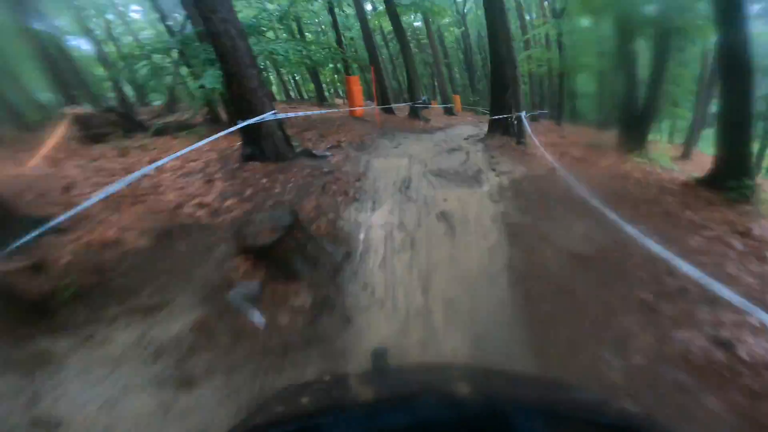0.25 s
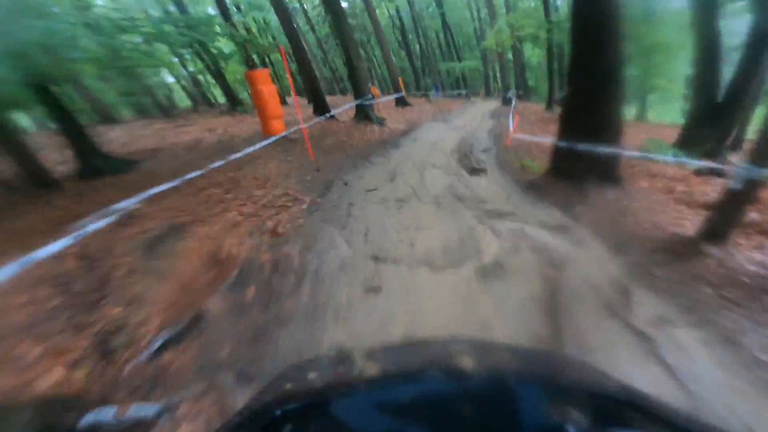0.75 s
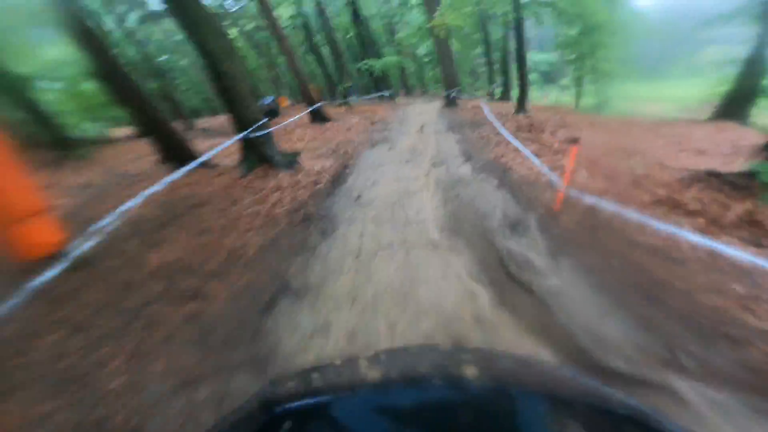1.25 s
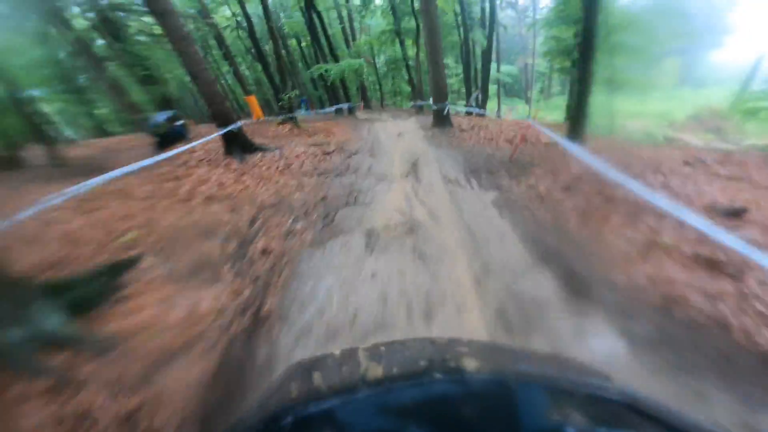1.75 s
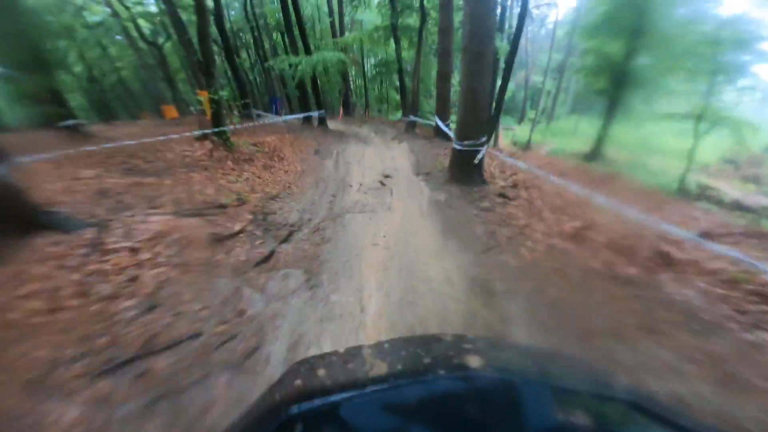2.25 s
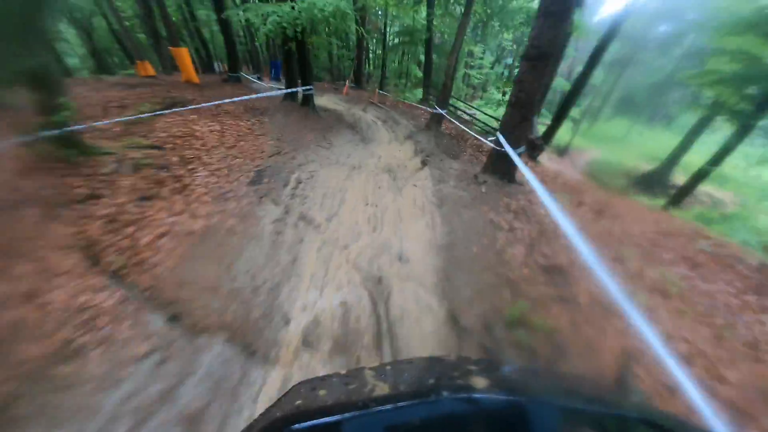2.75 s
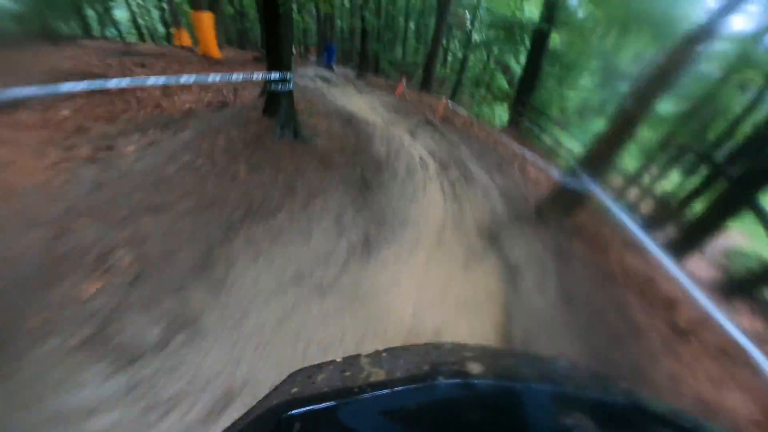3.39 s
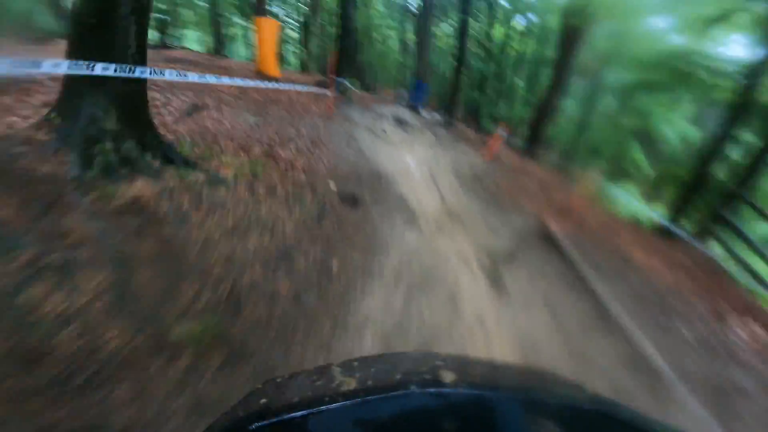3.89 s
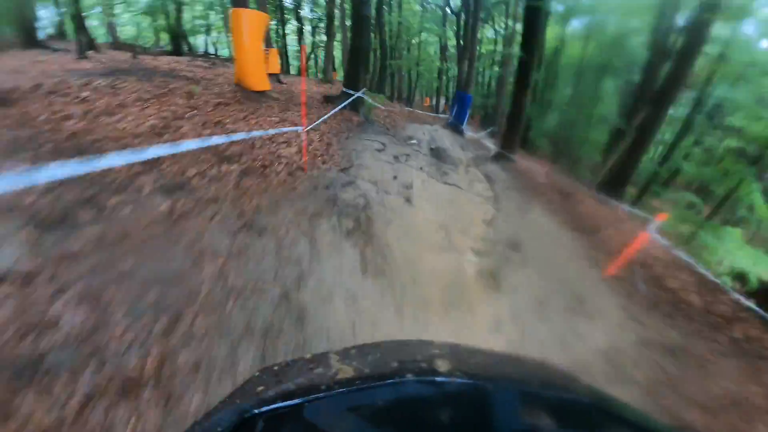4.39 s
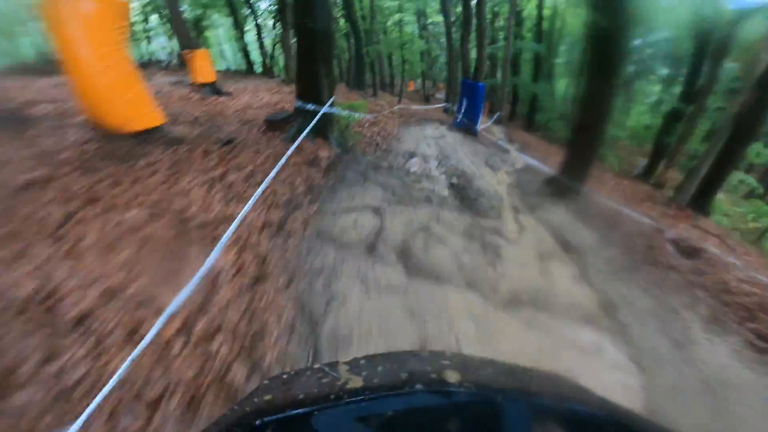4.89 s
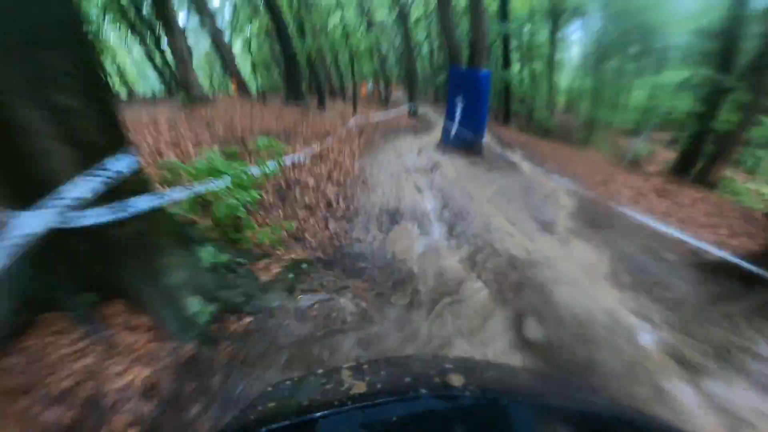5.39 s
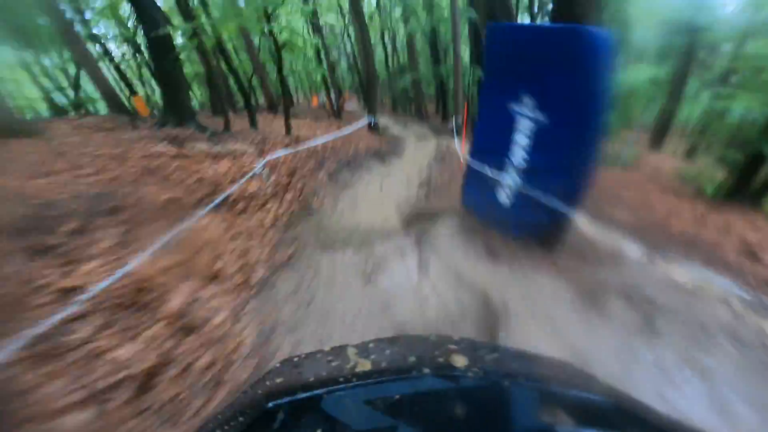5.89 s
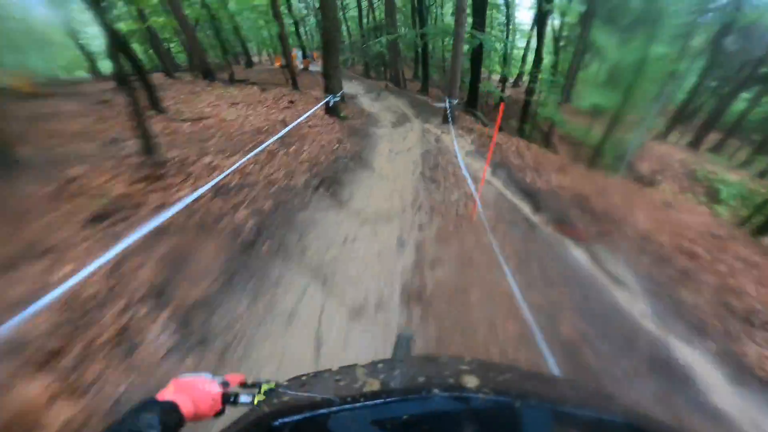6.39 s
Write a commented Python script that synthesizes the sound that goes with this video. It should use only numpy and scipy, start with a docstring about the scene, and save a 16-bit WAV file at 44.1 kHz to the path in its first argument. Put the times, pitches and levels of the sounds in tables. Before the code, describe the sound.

Close, muffled onboard sound of a fast ride over wet, rooty ground: low pulsing wind, hollow rolling tyres and irregular jolts. Hard, boxy knocks cluster early, ease off, then return singly and in small groups to the end. Small sharp ticks and wet spatters flick past. Around the middle comes a tiny high brake squeak ending on a crisp click; near the end a brighter splash and soft chain shiver. Treble is dulled, peaks rounded.

```python
"""Wind buffets a sealed housing on the helmet of a rider going fast down a wet, rooty forest track.
Tyres roll and jolt, mud sprays, grit ticks and the mount knocks; a wet brake sings briefly, the chain jingles.
Wind, tyres, mud and chain are shaped noise or random grains; knocks and ticks are struck decaying modes;
the brake is a wavering near-sine. The housing rounds the peaks and muffles the treble."""
import sys
import numpy as np
from scipy import signal
from scipy.fft import rfft, irfft
from scipy.io import wavfile

SR = 44100
rng = np.random.default_rng(int(sys.argv[2]) if len(sys.argv) > 2 else 0)


def unload_wav(signal):
    """Save mono or channel-first audio to the path in sys.argv[1] as 16-bit WAV at rate SR, clipped to [-1, 1]."""
    wavfile.write(
        sys.argv[1],
        SR,
        np.round(np.clip(np.atleast_2d(signal).T, -1, 1) * 32767).astype(np.int16),
    )


N = 292824

# ground under the tyres: (time [s], rolling level [dB], spray level [dB], grittiness [dB re rolling])
GROUND_CURVE = [(0.0, -31.5, -49, -0.5), (0.15, -34, -53, 13.5), (0.29, -41.5, -55, 16.5),
                (0.52, -27, -63, -2.5), (0.79, -31, -52.5, 9), (1.27, -33, -52.5, 1.5),
                (1.55, -29.5, -66, 4), (1.83, -30, -55, -0.5), (2.25, -30.5, -53.5, -0.5),
                (2.4, -28, -51.5, 0), (3.59, -31, -56.5, 4), (3.94, -25.5, -53, 2.5), (4.23, -34, -56, 2),
                (4.92, -32, -60, -6.5), (5.27, -31, -52, 2.5), (5.9, -28, -51.5, 2), (6.34, -34, -59, -5.5),
                (6.64, -34.5, -64, 0)]
# roots and stones hit by the wheels: (start [s], length [s], level [dB], grittiness [dB re level])
WHEEL_BUMPS = [(0.059, 0.036, -31.5, 16), (0.08, 0.05, -20, 6), (0.175, 0.025, -32.5, 15.5),
               (0.25, 0.032, -20.5, 7.5), (0.288, 0.021, -28, 9), (0.317, 0.018, -33, 9.5),
               (0.378, 0.016, -21.5, -10), (0.415, 0.011, -21.5, -19), (0.504, 0.011, -16, -5),
               (0.622, 0.038, -31, 14.5), (0.907, .03, -26.5, 1), (0.973, 0.057, -18, -24),
               (1.011, 0.0473, -22, 2.5), (1.08, 0.049, -18.5, -6.5), (1.169, 0.015, -26, 5),
               (1.241, 0.045, -19.5, -15), (1.341, 0.027, -19.5, -14), (1.379, 0.035, -21, -15),
               (1.451, 0.031, -22, -7), (1.872, 0.025, -30, 11.5), (2.26, 0.057, -27.5, 8),
               (2.366, 0.072, -32, 14.5), (2.54, 0.019, -30, 13.5), (2.609, 0.015, -29.5, 17.5),
               (2.817, 0.025, -28, -28), (3.049, 0.09, -30, -1), (3.167, 0.045, -19.5, -5),
               (3.274, 0.037, -24.5, 2), (3.753, 0.014, -18.5, 5.5), (3.873, 0.045, -26.5, -7),
               (4.021, 0.065, -30.5, 7.5), (4.106, 0.02, -28.5, 15.5), (4.352, 0.02, -22, -2),
               (5.09, 0.028, -28, 3), (5.012, 0.074, -28, 0), (5.147, 0.015, -23.5, -16),
               (5.278, 0.046, -34, 6), (5.411, 0.029, -36, 9), (5.609, 0.037, -24.5, -26),
               (5.93, 0.045, -28, -4), (6.098, 0.0063, -36, -10), (6.104, 0.011, -28, 10.5),
               (6.316, 0.02, -24, -24), (6.345, 0.026, -15.5, -28), (6.49, 0.0069, -24.5, -30)]
BUMP_ATTACK_S, BUMP_RELEASE_S = 0.0038, 0.0094


def amp(db):
    """Decibels to gain."""
    return 10 ** (np.asarray(db) / 20)


def rms_one(x):
    """Scale to rms 1."""
    return x / np.sqrt(np.mean(x ** 2) + 1e-20)


def in_time(rows):
    """Columns of a curve table, interpolated to one value a sample."""
    s, *columns = np.transpose(rows)
    return [np.interp(np.arange(N) / SR, s, column) for column in columns]


def drift(rate_hz):
    """Slow random wander of rms 1: noise through two equal poles at rate_hz."""
    step = 40   # samples between computed values
    pole = np.exp(-2 * np.pi * rate_hz * step / SR)
    noise = rng.standard_normal(N // step + 2002)
    slow = signal.lfilter([1], [1, -2 * pole, pole * pole], noise)[2000:]   # drop the run-in
    return np.interp(np.arange(N) / step, np.arange(len(slow)), rms_one(slow))


def filtered(x, order, cut_hz, kind="low"):
    """Butterworth filter."""
    return signal.sosfilt(signal.butter(order, cut_hz, kind, fs=SR, output="sos"), x)


def coloured(x, spectrum):
    """Give x a spectrum with minimum phase, so that nothing sounds before its cause; rms 1."""
    size = 2 ** 19
    hz, level_db = np.transpose(spectrum)
    grid_hz = np.maximum(np.fft.rfftfreq(size, 1 / SR), 1)
    log_gain = np.interp(np.log(grid_hz), np.log(hz), level_db) * np.log(10) / 20
    cepstrum = irfft(log_gain)
    # folding the cepstrum onto positive time gives the minimum phase
    cepstrum[1:size // 2] *= 2
    cepstrum[size // 2 + 1:] = 0
    response = np.exp(rfft(cepstrum))
    return rms_one(irfft(rfft(x, size) * response)[:N])


def grains(per_s, spread_db):
    """Random clicks of either sign at random times, with exponentially spread dB levels; rms 1."""
    level_db = spread_db * np.minimum(rng.exponential(1, N), 4)
    sizes = amp(level_db) * rng.choice([-1, 1], N)
    return rms_one(sizes * (rng.random(N) < per_s / SR))


def swells(rows, attack_s, release_s):
    """Gain of events that ramp up ahead of their start, hold for their length and die away; powers add."""
    t, power = np.arange(N) / SR, 0
    for s, length_s, db, *_ in rows:
        rise = np.clip(1 + (t - s) / attack_s, 0, 1) ** 2
        fall = np.exp(-np.maximum(t - s - length_s, 0) / release_s)
        power = power + (amp(db) * rise * fall) ** 2
    return np.sqrt(power)


def strike(events, dull, bright, rattle_s, soft_hz, contact_hz, scatter_db, detune):
    """Each blow chatters and rings all modes at scattered levels and pitches; sharper ones favour the bright."""
    s, blow_db, bright_db = np.transpose(events)
    after = np.arange(1500)
    after_s = after / SR
    at = np.minimum(np.round(s * SR).astype(int)[:, None] + after, N - 1)
    # loose parts bounce: sparse weaker touches that die away behind the first one
    chatter = 0.44 * rng.choice([-1, 1], at.shape) * (rng.random(at.shape) < 0.008)
    chatter[:, 0] = 1
    chatter *= np.exp(-after_s / rattle_s)
    chatter /= np.linalg.norm(chatter, axis=1, keepdims=True)   # touches share the blow's energy
    out = np.zeros(N)
    for modes, gain_db, cut_hz in ((dull, blow_db, soft_hz), (bright, blow_db + bright_db, contact_hz)):
        hz, level_db, t60_s = np.transpose(modes)[:, :, None]
        scatter, shift = rng.standard_normal((2, len(s), len(modes), 1))
        decay = amp(level_db + scatter_db * scatter - 60 * after_s / t60_s)
        rings = decay * np.sin(2 * np.pi * hz * (1 + detune * shift) * after_s)
        signs = (-1) ** np.arange(len(modes))[:, None]
        ring = amp(gain_db)[:, None] * (rings * signs).sum(axis=1)
        blows = signal.fftconvolve(ring, chatter, axes=1)[:, :len(after)]
        placed = np.bincount(at.ravel(), blows.ravel(), N)
        out += filtered(placed + 1e-18, 4, cut_hz)   # soft contact
    return out


def wind():
    """Slow eddies that saturate the port, and a lumpier flutter above them that every bump stirs up."""
    # (time [s], buffet level [dB], flutter level [dB])
    wind_curve = [(0.0, -19.5, -28.5), (0.39, -24.5, -22.5), (0.76, -19.5, -24.5), (0.81, -25, -29),
                  (1.26, -19, -20.5), (1.68, -19.5, -26), (2.03, -17, -22), (2.16, -18, -24.5),
                  (2.6, -17, -24), (2.85, -17, -29.5), (2.97, -17.5, -29.5), (3.37, -13.5, -26.5),
                  (3.4, -36, -36), (3.5, -18.5, -19.5), (3.73, -16.5, -28.5), (4.46, -22.5, -28),
                  (4.55, -19, -33), (4.71, -17, -27), (5.0, -16.5, -27), (5.4, -19, -29), (5.9, -16, -27),
                  (6.25, -19.5, -28.5), (6.64, -21, -25)]
    # relative noise spectra: (frequency [Hz], level [dB per Hz])
    buffet_spectrum = [(12, -5), (25, 7.5), (50, 7), (80, 0.5), (120, -5.5), (200, -74), (1000, -95.5)]
    flutter_spectrum = [(60, -17.5), (95, 1), (170, -6), (250, -16.5), (400, -45), (1500, -99)]
    flutter_by_bump_db, thud_share = -4.5, 0.16   # a bump shakes the housing in the air stream, a dull one more
    buffet_db, flutter_db = in_time(wind_curve)
    buffet = rms_one(np.tanh(0.59 * coloured(rng.standard_normal(N), buffet_spectrum)))
    flutter = coloured(rng.standard_normal(N) * amp(2.26 * drift(28.4)), flutter_spectrum)
    thuds = [(s, length_s, db + flutter_by_bump_db - thud_share * gritty_db)
             for s, length_s, db, gritty_db in WHEEL_BUMPS]
    stirred = swells(thuds, BUMP_ATTACK_S, BUMP_RELEASE_S)
    buffet_gain = amp(buffet_db + 1.8 * drift(3.16))
    flutter_gain = np.hypot(amp(flutter_db + 0.5 * drift(3.5)), stirred)
    return buffet_gain * buffet + flutter_gain * flutter


def tyres():
    """Small jolts from stones and roots through frame and housing, over a hollow hum of the tread."""
    # relative noise spectra: (frequency [Hz], level [dB per Hz])
    roll_spectrum = [(130, -2), (220, 2), (380, -6), (560, -7), (680, -12.5), (1090, -17), (1500, -27.5),
                     (2200, -36), (4000, -64.5), (9000, -110)]
    hum_spectrum = [(300, -34.5), (480, 0.5), (560, 7.5), (650, -5.5), (1100, -16.5), (2000, -33.5),
                    (5000, -41.5), (8000, -80.5)]
    rolling_db, _, grit_db = in_time(GROUND_CURVE)
    rolling_db = rolling_db + 1.0 * drift(16.0)
    jolting = np.hypot(amp(rolling_db), swells(WHEEL_BUMPS, BUMP_ATTACK_S, BUMP_RELEASE_S))
    crunches = [(s, length_s, db + gritty_db) for s, length_s, db, gritty_db in WHEEL_BUMPS]
    crunching = np.hypot(amp(rolling_db + grit_db), swells(crunches, BUMP_ATTACK_S, BUMP_RELEASE_S))
    shake = rng.standard_normal(N) * amp(2.04 * drift(29)) + 0.68 * grains(500, spread_db=2.5)
    hum_db = -39.0 + 1.3 * (rolling_db - rolling_db.mean()) + 0.54 * drift(23)
    hum = amp(hum_db) * coloured(rng.standard_normal(N), hum_spectrum)
    roll = coloured(shake * jolting, roll_spectrum) * np.sqrt(np.mean(jolting ** 2))
    # grit under the tread makes the upper part come and go on its own
    dull = filtered(roll, 2, 850)
    gritty = filtered(roll, 2, 850, "high")
    fine = filtered(gritty, 2, 1500, "high")
    # coarse and fine grit crunch apart
    crunch = (gritty + fine) * amp(2.05 * drift(51)) - fine * amp(4.0 + 4.2 * drift(49))
    return dull - crunch * crunching / jolting + hum


def mud():
    """Spray thrown up by the wheels: hiss in clumps with droplets; heavy splashes are brighter."""
    # wet patches: (start [s], length [s], level [dB])
    splashes = [(.6, 0.06, -40), (.685, 0.032, -39.5), (.8, 0.031, -56), (1.71, 0.044, -45.5),
                (1.85, 0.076, -47), (1.96, 0.061, -46.5), (2.26, 0.1, -40), (3.045, 0.023, -47),
                (3.11, 0.035, -43), (3.18, 0.051, -41.5), (3.48, 0.15, -50.5), (3.64, 0.035, -41.5),
                (4.49, 0.01, -49.5), (4.57, 0.066, -47), (5.03, 0.044, -46.5), (5.075, 0.029, -41.5),
                (5.168, 0.0081, -44.5), (5.53, 0.036, -47), (5.34, 0.076, -47), (5.458, 0.012, -38.5),
                (5.69, 0.02, -50), (5.755, 0.018, -46), (5.895, 0.02, -36.5), (5.94, 0.035, -31.5)]
    # relative noise spectrum: (frequency [Hz], level [dB per Hz])
    spray_spectrum = [(700, -3.5), (1500, 13.5), (2200, 3.5), (3300, 0.5), (4200, -5.5), (4700, -5.5),
                      (5700, -11), (7000, -18), (9000, -31), (13000, -53)]
    steady = amp(in_time(GROUND_CURVE)[1] + 1.3 * drift(3.4))
    splash = np.hypot(steady, swells(splashes, attack_s=0.011, release_s=0.025))
    drops = rng.standard_normal(N) * amp(2.8 * drift(41)) + 0.14 * grains(890, spread_db=12.5)
    spray = splash * coloured(drops, spray_spectrum)
    top = filtered(spray, 4, 6500, "high")
    return spray + top * (splash / amp(-32.0)) ** 1.6


def grit_ticks():
    """Grit and chain ticks: light, hard contacts ring small stiff parts for milliseconds."""
    # (time [s], level [dB], brightness [dB])
    tick_events = [(0.0692, -38, -18), (0.299, -19, -29.5), (0.35, -53, -8), (0.4, -54, -2),
                   (0.5975, -43, -17), (0.801, -47, 1), (0.848, -47, -7), (0.9263, -32, -30),
                   (1.8881, -20.5, -25), (1.939, -49, 0), (1.9654, -37, -29), (2.031, -50, -8),
                   (2.0587, -35.5, -7), (2.263, -55, -12), (2.307, -42, -4), (2.455, -50, -8),
                   (3.049, -35, -18), (3.1188, -38, -5), (3.1946, -23.5, -19), (3.2296, -26, -32),
                   (3.5869, -15, -19), (3.597, -27, -18), (3.6376, -42, -24), (3.6614, -36, -31),
                   (3.676, -30, -25), (4.056, -46, 0), (4.124, -34.5, -24), (4.1829, -37, -23),
                   (4.275, -39, -27), (4.571, -41, -7), (5.1716, -37, -8), (5.339, -46, 3),
                   (5.3962, -28.5, -20), (5.4475, -40, 2), (5.531, -34.5, -10), (5.6087, -32.5, -8),
                   (5.683, -41, -6.5), (5.756, -41, -8), (5.782, -28.5, -12), (5.803, -37, -22),
                   (5.873, -46, -23), (5.8952, -32, -5), (5.916, -34, -5), (6.1543, -35, -28),
                   (6.263, -46.5, -1), (6.3235, -42, -16)]
    # modes, before detuning and scatter: (frequency [Hz], relative level [dB], t60 [s])
    dull_modes = [(1630, -2, 0.012), (2110, 2, 0.004), (3860, 5, 0.0011)]
    bright_modes = [(4550, 6, 0.0033), (6040, -5, 0.0089), (6850, -6.5, 0.0095)]
    return strike(tick_events, dull_modes, bright_modes, rattle_s=0.002,
                  soft_hz=4000, contact_hz=6600, scatter_db=3.0, detune=0.065)


def mount_knocks():
    """The mount knocks on the helmet: low and middle modes ring briefly under a soft contact."""
    # (time [s], level [dB], brightness [dB])
    knock_events = [(0.093, -19, 5), (0.1, -17.5, -5), (0.135, -9.5, -4.5), (0.253, -6.5, -2.5),
                    (0.262, -10.5, -5.5), (0.3, -15, 7.5), (0.374, -22, 0), (0.388, -24, 1),
                    (0.408, -7, -36), (0.42, -10, 1.5), (0.505, -22, -22), (0.65, -17, 4),
                    (0.927, -11, -1.5), (0.96, -11, -17), (1.029, -7, -2), (1.043, -9, -7),
                    (1.053, -15, -11), (1.084, -19, 5), (1.105, -20.5, 10.5), (1.113, -26, -9),
                    (1.121, -1.5, -4.5), (1.184, -20, -2), (1.204, -20.5, 1), (1.263, -2.5, -9.5),
                    (1.348, -11, -26), (1.409, -3.5, -23), (1.444, -4.5, -8.5), (1.465, -1.5, -11.5),
                    (1.479, -8, -5.5), (1.489, -9, -35), (1.611, -1.5, -11.5), (1.89, -15, -4),
                    (2.388, -17.5, -1), (2.532, -27, 10), (2.612, -24, 6.5), (2.825, -3, -43),
                    (3.047, -11.5, -7.5), (3.183, -6.5, -19), (3.23, -10.5, 2.5), (3.587, -9, -8),
                    (3.757, -14, -6), (3.764, -2, -32.5), (4.122, -13.5, 3.5), (4.352, -15.5, -5),
                    (4.359, -11, -21), (5.091, -16, -21.5), (5.354, -8, -7), (5.394, -14.5, -1),
                    (5.456, -18, 3.5), (5.76, -16.5, 5.5), (5.783, -16, 3), (5.897, -22, 5.5),
                    (5.944, -11.5, -1), (6.353, -9.5, -36), (6.359, -6, -32), (6.5, -1.5, -32),
                    (6.525, -7, -3.5)]
    # modes, before detuning and scatter: (frequency [Hz], relative level [dB], t60 [s])
    dull_modes = [(134, 0, 0.021), (282.5, 5.5, 0.014), (327.6, 5.5, 0.0099)]
    bright_modes = [(580, 5.5, 0.0055), (752, 7.5, 0.011), (959, 9, 0.0055), (1188, 6, 0.0039),
                    (1640, -13, 0.0049)]
    return strike(knock_events, dull_modes, bright_modes, rattle_s=0.0076,
                  soft_hz=790, contact_hz=1720, scatter_db=1.5, detune=0.072)


def brake():
    """A wet pad on the disc: a near-sine that fades in and out and wavers as the pad grips and slips."""
    # (time [s], centre pitch [Hz], mean level [dB])
    squeal_curve = [(3.415, 1895, -61), (3.448, 1965, -41), (3.472, 2010, -44), (3.486, 2035, -43),
                    (3.52, 1995, -39), (3.558, 1975, -41), (3.57, 2050, -45), (3.59, 1980, -31)]
    hz, level_db = in_time(squeal_curve)
    t = np.arange(N) / SR
    fade_s = 0.0049
    on = np.clip(np.minimum(t - squeal_curve[0][0], squeal_curve[-1][0] - t) / fade_s, 0, 1)
    phase = 2 * np.pi * np.cumsum(hz * (1 + 0.004 * drift(60))) / SR
    return on * amp(level_db) * (1 + 0.4 * drift(80)) * np.sin(phase)


def chain():
    """Links shiver against each other, a narrow metallic hiss that dies away."""
    # (start [s], level [dB], t60 [s])
    jingle_events = [(3.69, -59, 0.092), (3.755, -59, 0.083), (5.173, -48.5, 0.21), (5.974, -44.5, 0.18)]
    # relative spectrum: (frequency [Hz], level [dB per Hz])
    jingle_spectrum = [(3500, -46), (4500, -6.5), (4700, 3), (4950, -19), (5200, 1.5), (5400, -9.5),
                       (5680, -3.5), (6000, -11), (8000, -38)]
    t = np.arange(N) / SR
    shiver = sum(amp(db - 60 * np.maximum(t - s, 0) / t60_s) * (t > s) for s, db, t60_s in jingle_events)
    return shiver * coloured(grains(1200, spread_db=-1.5), jingle_spectrum)


def scene():
    """All sources at the single microphone."""
    return (wind() + tyres() + mud() + grit_ticks() + mount_knocks() + brake() + chain())[None]


def record(dry):
    """Peaks are rounded, the housing dulls the treble, the top is cut steeply."""
    rounded = 0.61 * np.tanh(dry / 0.71)
    muffled = filtered(rounded, 2, 9000)
    return signal.sosfilt(signal.cheby2(12, 70, 14200, fs=SR, output="sos"), muffled)


dry = scene()
out = record(dry)
unload_wav(out)
```